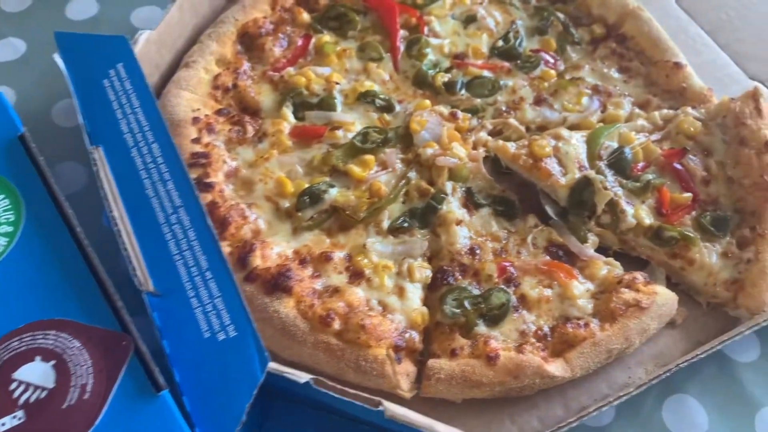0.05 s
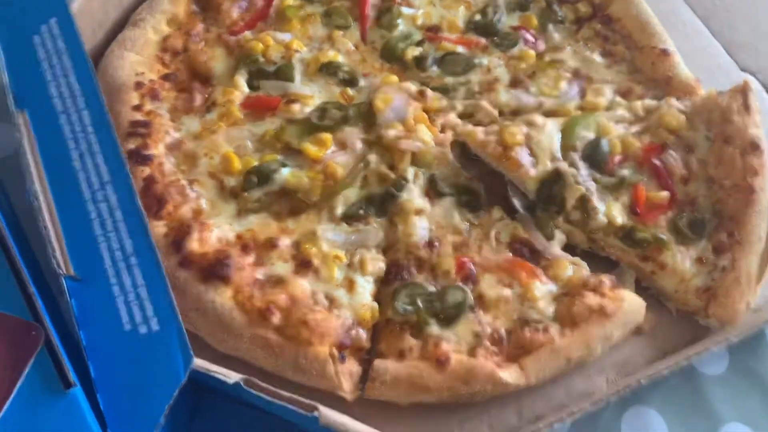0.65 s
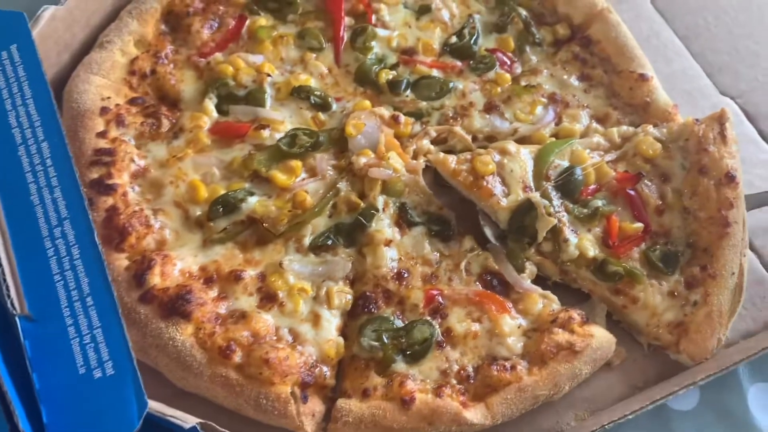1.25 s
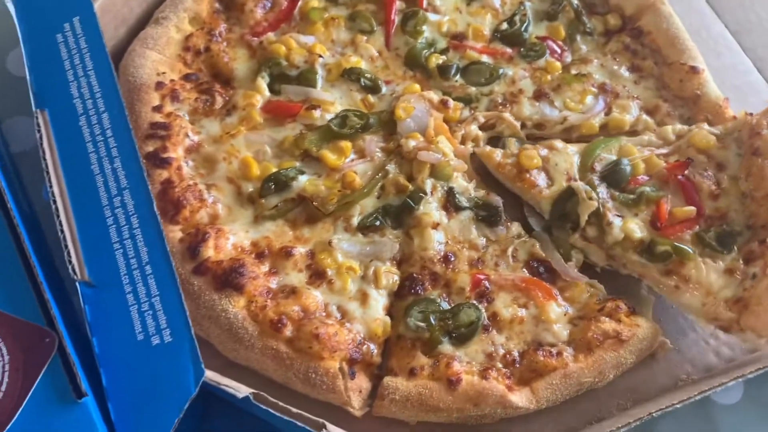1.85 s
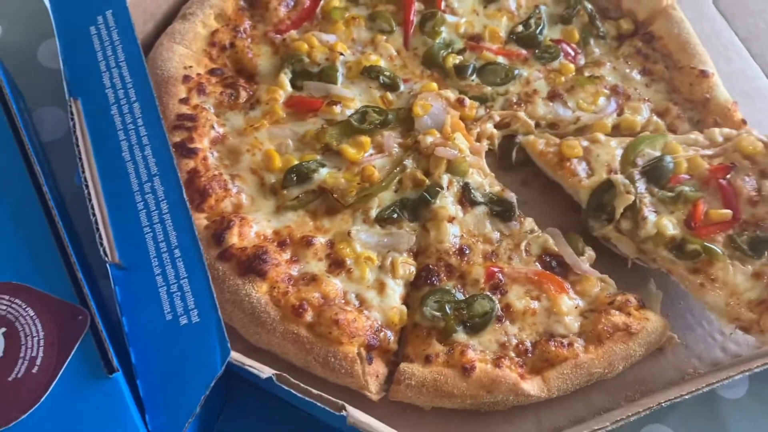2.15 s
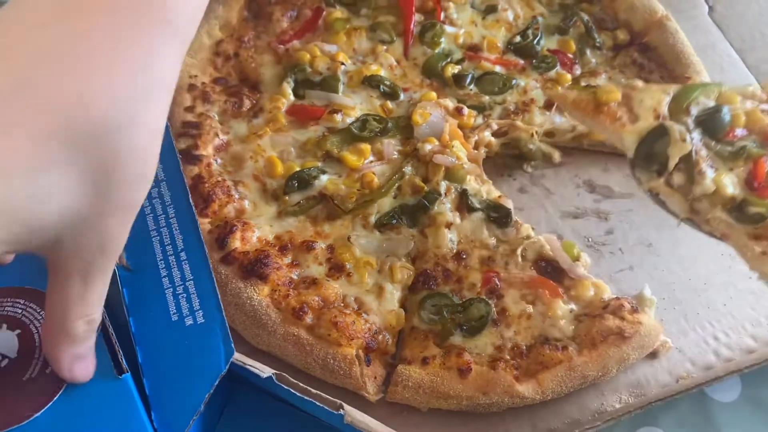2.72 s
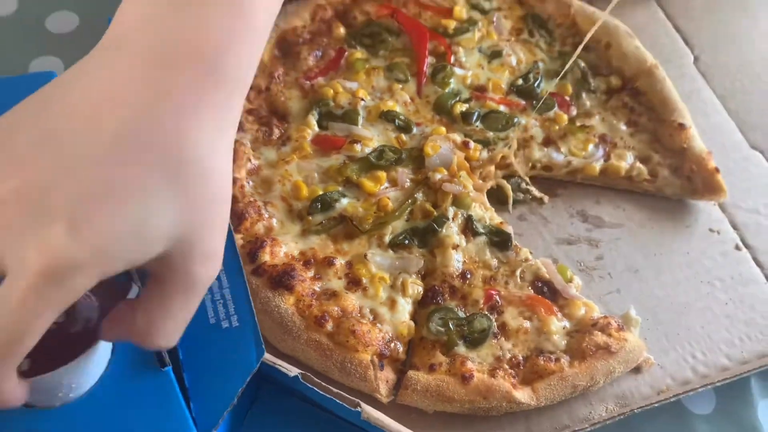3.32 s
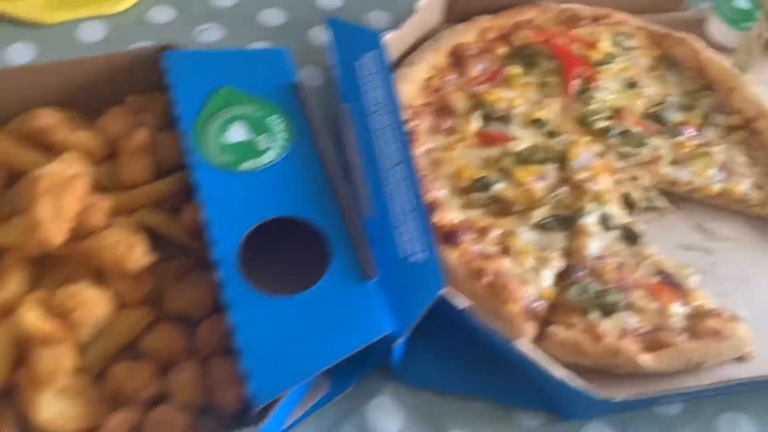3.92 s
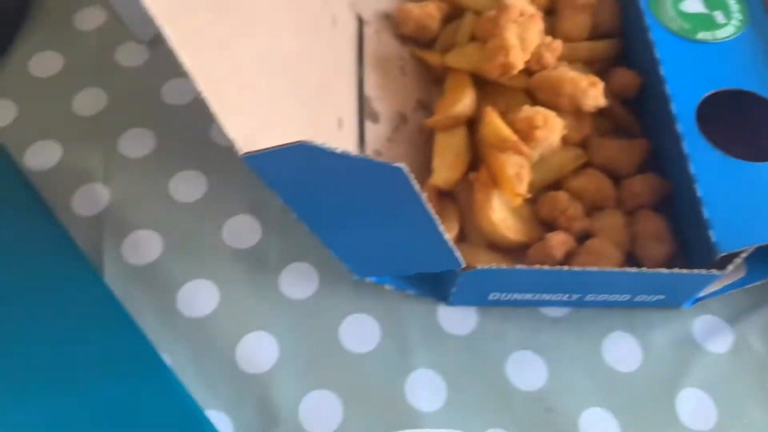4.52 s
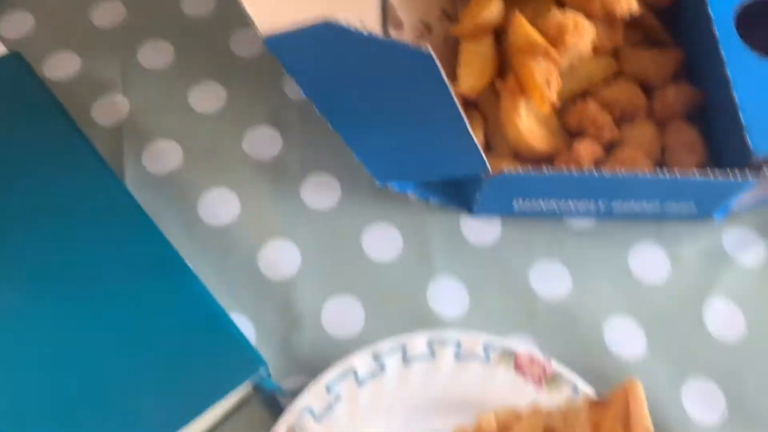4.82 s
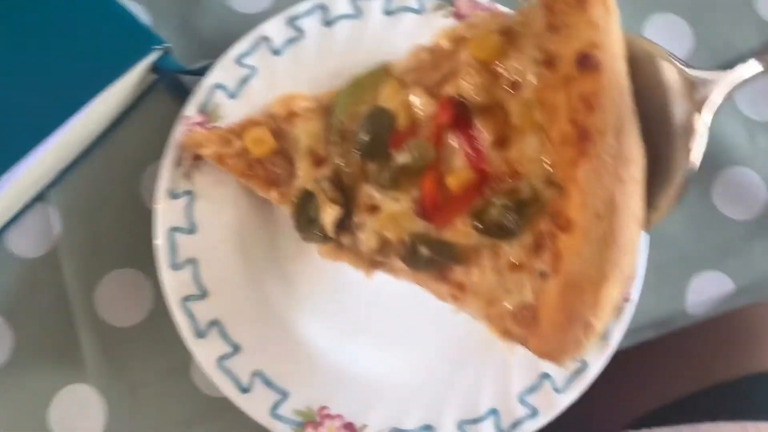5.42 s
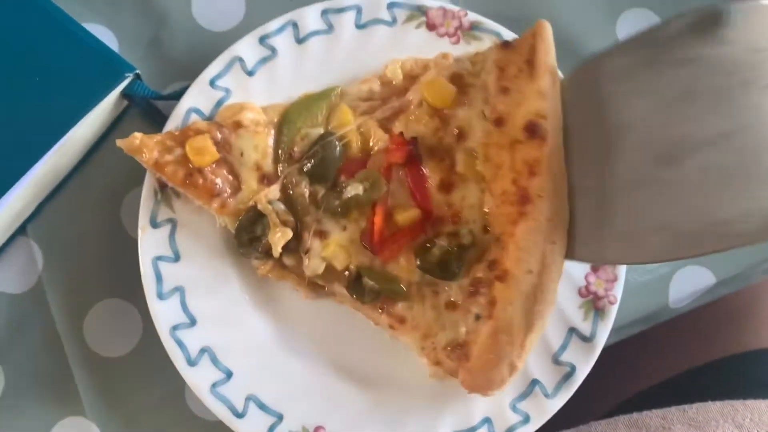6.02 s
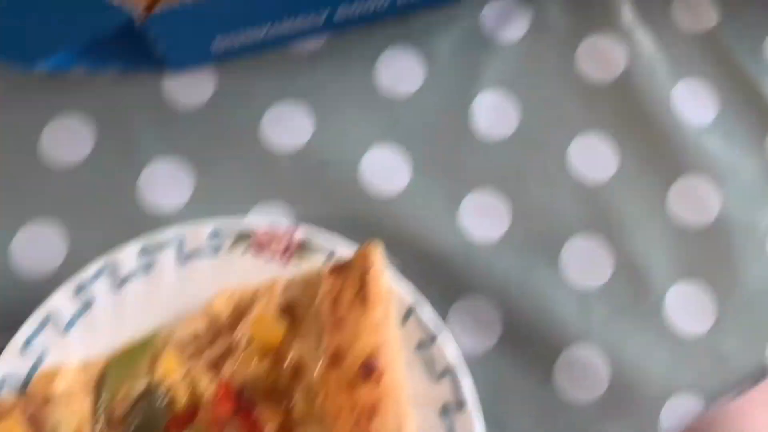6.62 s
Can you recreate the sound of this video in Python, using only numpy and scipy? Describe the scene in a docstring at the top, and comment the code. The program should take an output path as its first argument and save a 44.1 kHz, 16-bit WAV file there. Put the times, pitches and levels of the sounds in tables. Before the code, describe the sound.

Quiet pizza box handling, sharp clinks and scrapes of metal on a plate, and a short chair scrape in a small room.

```python
"""In a small, quiet dining room a slice of pizza is lifted from its cardboard box on a steel server.
The box rustles, flexes, bumps and ticks as hands, server and crust move over it.
From 5 s the blade clinks on a china plate, then scrapes out from under the crust, ringing at
other pitches once it is bare. At 6.5 s a chair judders over the floor, its leg sticking and slipping."""
import sys
import numpy as np
from scipy import signal
from scipy.fft import rfft, irfft, next_fast_len
from scipy.io import wavfile
from scipy.ndimage import uniform_filter1d

SR = 44100
rng = np.random.default_rng(int(sys.argv[2]) if len(sys.argv) > 2 else 0)


def output_pcm(signal):
    """Save a mono or channel-first signal as 16-bit PCM at the path in sys.argv[1].

    Samples are clipped to [-1, 1] before scaling.
    """
    pcm = np.clip(np.atleast_2d(signal).T, -1, 1) * 32767
    wavfile.write(sys.argv[1], SR, np.round(pcm).astype(np.int16))


N = 293645

# Cardboard panel modes. Each row: frequency in Hz, level in dB, t60 in seconds.
PANEL_MODES = [(310.5, -13, 0.11), (496, -12.5, 0.037), (719, 0.5, 0.015), (980, -6.5, 0.022),
               (1247, -1, 0.015), (1538, 1.5, 0.012), (2130, 4.5, 0.0058), (3290, -1.5, 0.012),
               (3950, -4.5, 0.011), (5350, -1.5, 0.0073), (9400, 2.5, 0.002)]
# China plate, damped by slice and cloth. Each row: frequency in Hz, level in dB, t60 in seconds.
PLATE_MODES = [(3170, 2, 0.03), (3900, -1, 0.021), (4130, 2.5, 0.047), (5250, 5.5, 0.025), (6877, 7, 0.032),
               (8630, -2, 0.019), (9650, -3, 0.03), (10400, 0, 0.02), (11340, -1.5, 0.075),
               (12230, -3, 0.025), (13960, -4, 0.05), (14868, -2, 0.094)]


def from_db(db):
    """Decibels to gain."""
    return 10 ** (np.asarray(db) / 20)


def rms_one(x):
    """Scale to unit rms."""
    return x / np.sqrt(np.mean(x ** 2) + 1e-20)


def peak_one(x):
    """Scale the loudest millisecond to unit rms."""
    return x / np.sqrt(uniform_filter1d(x ** 2, size=44).max())


def even(x, samples):
    """Hold the running rms at 1."""
    return x / np.sqrt(np.abs(uniform_filter1d(x ** 2, samples)) + 1e-12)


def cut(x, hz, kind, order=2):
    """Butterworth low- or high-pass."""
    return signal.sosfilt(signal.butter(order, min(hz, .45 * SR), kind, fs=SR, output="sos"), x)


def add(track, start_s, sound):
    """Mix a short sound into a track."""
    i = int(start_s * SR)
    track[i:i + len(sound)] += sound[:N - i]


def pan_left(x, db):
    """Left up, right down by db."""
    return x * from_db([[db], [-db]])


def wander(hz, samples=N):
    """Low-passed noise, unit rms."""
    return rms_one(cut(rng.standard_normal(samples), hz, "low"))


def at_hz(points, hz):
    """Interpolate on a log-frequency axis."""
    points_hz, values = np.transpose(points)
    return np.interp(np.log(hz + 0.0016), np.log(points_hz), values)


def coloured(pair, spectrum):
    """Two independent noises to partly alike stereo noise of a given spectrum, unit rms."""
    # Each row: frequency in Hz, left-right correlation.
    likeness = [(60, 1), (250, .88), (700, 0.069), (1300, 0.11), (2500, 0.91), (5000, 1), (15000, 1)]
    size = next_fast_len(N)
    hz = np.arange(size // 2 + 1) * SR / size
    low_hz, high_hz = spectrum[0][0], spectrum[-1][0]
    band_edges = np.sqrt((1 + (low_hz / (hz + 1)) ** 6) * (1 + (hz / high_hz / 1.2) ** 8))
    mid, side = rfft(pair, size) * from_db(at_hz(spectrum, hz)) / band_edges
    alike = np.clip(at_hz(likeness, hz), 0, 1)
    stereo = np.sqrt(1 + alike) * mid + np.sqrt(1 - alike) * side * [[1], [-1]]
    return rms_one(irfft(stereo, size)[:, :N])


def ring(push, modes, vary_db=0):
    """Drive a body's modes; the contact point varies their strengths."""
    out = 0
    for k, (hz, db, t60_s) in enumerate(modes):
        r, w = from_db(-60 / (t60_s * SR)), 2 * np.pi * hz / SR
        gain = (-1) ** k * from_db(db + vary_db * rng.standard_normal())
        out = out + gain * signal.lfilter([0, np.sin(w)], [1, -2 * r * np.cos(w), r * r], push + 1e-18)
    return out


def favour(modes, centre_hz, boost_db):
    """The contact point drives modes near one frequency hardest."""
    return [(hz, db + boost_db * np.exp(-(np.log(hz / centre_hz) / 0.09) ** 2), t60_s)
            for hz, db, t60_s in modes]


def contact(length_s, chatter, samples=11000):
    """One sharp touch, then smaller ones dying 30 dB in length_s."""
    t = np.arange(samples) / SR
    touches = rng.standard_normal(samples) * (rng.random(samples) < .3)
    push = chatter * touches * from_db(-30 * t / length_s)
    push[0] = 1
    return push


def grains(per_s, spread_db, smooth):
    """Two streams of tiny uneven slips over smooth friction noise."""
    sizes = from_db(spread_db * np.minimum(rng.exponential(1, (2, N)), 4))
    signs = rng.choice([-1, 1], (2, N))
    slips = sizes * signs * (rng.random((2, N)) < per_s / SR)
    return rms_one(slips) + smooth * rng.standard_normal((2, N))


def grip(depth_db):
    """Friction gain wandering with hand pressure."""
    return rms_one(from_db(depth_db * wander(hz=30)))


def swells(events, rise_db_per_s, fall_db_per_s, sag_db_per_s=0):
    """Envelope: each event rises until its start, holds or sags for its length, then falls."""
    step_samples = 44
    t = np.arange(0, N + step_samples, step_samples) / SR
    power = 1e-14
    for start_s, length_s, db in events:
        drop_db = (rise_db_per_s * np.maximum(start_s - t, 0)
                   + sag_db_per_s * np.clip(t - start_s, 0, length_s)
                   + fall_db_per_s * np.maximum(t - start_s - length_s, 0))
        power = power + from_db(db - drop_db) ** 2
    return np.interp(np.arange(N) / SR, t, np.sqrt(power))


def room_tone():
    """Steady quiet noise with a faint high whine."""
    # Each row: frequency in Hz, relative density in dB.
    spectrum = [(40, -8), (100, -3), (280, 1), (500, -5), (950, -12), (1320, -3), (1700, -15), (2400, -22),
                (3250, -14), (4200, -19), (5500, -22), (6350, -18), (7700, -25), (15500, -25)]
    # Each row: frequency in Hz, level in dB, t60 in seconds.
    whine_modes = [(6200, -6.5, 0.0083), (11000, 2, 0.0082)]
    noise = coloured(rng.standard_normal((2, N)), spectrum)
    whine = rms_one(ring(rng.standard_normal(N), whine_modes))
    return from_db(-56.5) * noise + from_db(-73.5) * whine


def stroke(events):
    """A movement over cardboard swells, tires a little and lets go."""
    return swells(events, rise_db_per_s=428, fall_db_per_s=133, sag_db_per_s=4.5)


def within_box(x):
    """Lid, walls and table reflect within milliseconds."""
    # Each row: delay in seconds, gain in dB.
    echoes = [(.0011, -17), (.0023, -41.5), (.0037, -27.5), (.0061, -9.5)]
    t = np.arange(N) / SR
    return x + sum(from_db(db) * np.array([np.interp(t - delay_s, t, side, left=0) for side in x])
                   for delay_s, db in echoes)


def box_rustle():
    """Fibres rub, crackle and ring the panels; crust hisses over the board."""
    # Hand, server and crust moves. Each row: start and length in seconds, rub and hiss levels in dB.
    strokes = [(0.009, 0.045, -57, -59), (0.119, 0.018, -46.5, -49), (0.252, 0.036, -51, -50),
               (0.508, 0.017, -52.5, -56.5), (1.362, 0.038, -56.5, -48), (1.543, 0.032, -45, -46),
               (1.87, 0.042, -44.5, -46.5), (1.97, .1, -48.5, -55), (2.08, 0.03, -51, -48),
               (2.167, 0.095, -48, -52), (2.395, 0.006, -50.5, -45), (2.551, 0.01, -40.5, -51),
               (2.606, 0.086, -50, -52), (2.714, 0.19, -48.5, -95), (2.94, 0.069, -52.5, -58.5),
               (3.03, 0.05, -48, -58.5), (3.164, 0.046, -55, -48.5), (3.275, 0.027, -52, -53.5),
               (3.332, 0.13, -55.5, -58.5), (4.3, 0.38, -56, -69), (4.74, 0.13, -50.5, -62),
               (4.916, 0.19, -48, -50), (5.107, 0.11, -54.5, -102), (6.146, 0.039, -72, -55.5)]
    # Fibre rub and crust hiss. Each row: frequency in Hz, relative density in dB.
    rub_spectrum = [(150, 4.5), (400, 3.5), (1500, 4.5), (3500, -3), (8000, -14), (15500, -14.5)]
    hiss_spectrum = [(3000, -2.5), (6500, 5), (15500, 2)]
    start_s, length_s, rub_db, hiss_db = np.transpose(strokes)
    rubbing = stroke(zip(start_s, length_s, rub_db))
    sliding = stroke(zip(start_s, length_s, hiss_db))
    fibres = grains(per_s=1300, spread_db=2.5, smooth=1.0)
    panels = from_db(-11) * rms_one(ring(fibres[1], PANEL_MODES))
    rub = from_db(-3.5) * rubbing * (coloured(fibres, rub_spectrum) + panels)
    crust = grains(per_s=13000, spread_db=4.0, smooth=0.76)
    hiss = from_db(-4) * sliding * coloured(crust, hiss_spectrum)
    snaps = grains(per_s=70, spread_db=1.5, smooth=0)[0]
    crackle = from_db(-11.5) * rubbing * rms_one(ring(snaps, PANEL_MODES))
    return within_box((rub + hiss + crackle) * grip(depth_db=1.5))


def box_flex():
    """Panels bend under load with a low rumble."""
    # Each row: start in seconds, length in seconds, level in dB.
    flexes = [(.05, 0.065, -52.5), (.135, 0.13, -43.5), (.34, 0.024, -57), (.53, 0.078, -53.5),
              (1.32, 0.43, -60.5), (1.905, 0.19, -58), (2.4, 0.017, -61.5), (2.7, 0.26, -57),
              (4.07, 0.042, -48), (4.92, 0.024, -51), (5.025, 0.23, -57.5), (5.15, 0.047, -50),
              (5.975, 0.015, -52.5)]
    # Each row: frequency in Hz, relative density in dB.
    spectrum = [(25, -62), (50, -0.5), (90, -8), (140, 9.5), (190, -3), (280, -0.5), (450, -6), (800, -8)]
    rumble = coloured(grains(per_s=270, spread_db=4.0, smooth=0.78), spectrum)
    return from_db(1.3) * stroke(flexes) * rumble


def hum(hz, rise_s):
    """A wavering tone that swells and dies."""
    t = np.arange(SR // 2) / SR
    swell = t / rise_s * np.exp(1 - t / rise_s)
    waver = 1 + 0.085 * wander(hz=95, samples=len(t))
    return swell ** 2 * np.sin(2 * np.pi * np.cumsum(hz * waver) / SR)


def box_bumps():
    """Soft pushes make the hollow box hum and the table thud; near 5 s the server's blow knocks it as well."""
    # Each row: start in seconds, level in dB, resonance in Hz, rise in seconds, thud in dB re the hum.
    bumps = [(.16, -34, 159, 0.02, -10), (.2, -44, 105, 0.023, -22), (0.265, -50.5, 231, 0.056, 1),
             (0.53, -48.5, 257, 0.022, -21), (1.29, -48.5, 68.5, 0.011, -11), (1.896, -42, 504, 0.021, -29),
             (2.853, -41, 131.6, 0.025, -35), (4.048, -39.5, 236, 0.027, -13), (4.06, -45, 131, 0.034, -24),
             (5.002, -34.5, 358, 0.0047, -13), (5.022, -48, 48.3, 0.044, -8)]
    out = np.zeros(N)
    for start_s, db, hz, rise_s, thud_db in bumps:
        bump = hum(hz, rise_s) + from_db(thud_db) * hum(hz=78.1, rise_s=0.05)
        add(out, start_s, from_db(db) * bump)
    return pan_left(out, db=0.69)


def box_taps():
    """Dead cardboard knocks, the brighter ones with a dry snap."""
    # Each row: start in seconds, peak in dB, snap in dB re the body, favoured Hz, chatter in seconds.
    taps = [(0.254, -52, -8, 640, 0.021), (1.542, -36.5, -10, 886, 0.0098), (1.597, -25, 25, 2410, 0.0017),
            (1.615, -41, 9, 2340, 0.0046), (2.063, -38.5, -14, 730, 0.0062), (2.21, -35, 10, 1500, 0.012),
            (2.2564, -31, 5.5, 1530, 0.025), (2.273, -42, -5, 1260, 0.08), (2.4724, -35, -4, 1690, 0.026),
            (2.531, -38, -18, 1060, 0.022), (2.5518, -31.5, 0, 3760, 0.012), (2.58, -46, -12, 1550, 0.018),
            (2.66, -44, 3, 3670, 0.014), (2.718, -35.5, -4.5, 2450, 0.0057),
            (3.028, -41.5, -7, 1404, 0.024), (3.041, -44, -3, 1430, 0.027), (3.093, -45.5, 3, 1490, 0.043),
            (3.296, -48, 4, 1380, 0.014), (3.311, -41.5, 5, 1480, .005), (3.337, -42.5, -27, 683, 0.094),
            (3.996, -48.5, -32, 1260, 0.12), (4.054, -37.5, -42, 636, 0.041),
            (4.055, -42, 25, 1950, 0.0088), (4.07, -38, -46, 2010, 0.14)]
    out = np.zeros(N)
    for start_s, db, snap_db, favoured_hz, chatter_s in taps:
        push = contact(chatter_s, chatter=0.45)
        body = peak_one(ring(push, favour(PANEL_MODES, favoured_hz, boost_db=18)))
        snap = from_db(snap_db) * peak_one(cut(push, 3600, "high", order=1))
        add(out, start_s, from_db(db) * peak_one(body + snap))
    return out


def box_squeak(start_s=0.573, length_s=0.12, db=-59.5):
    """Board squeaks faintly on board."""
    # Each row: frequency in Hz, level in dB, t60 in seconds.
    modes = [(2450, 6.5, 0.014), (3000, 2.2, 0.0098)]
    return stroke([(start_s, length_s, db)]) * rms_one(ring(rng.standard_normal(N), modes))


def blade_modes(bare, favoured_hz, boost_db, detune):
    """Steel modes with or without the slice's weight; changing load shifts each a little."""
    # Each row: frequency in Hz, level in dB, t60 in seconds.
    loaded_modes = [(2418, -11.5, 0.05), (2990, -9, 0.059), (3856, 0, 0.054), (4920, -7, 0.02),
                    (5373, -2.5, 0.071), (5900, -13, 0.032), (6830, -1.5, 0.074), (6890, -9, 0.024),
                    (7700, -12, 0.03), (8400, 4, 0.034), (9220, 1.5, 0.023), (10450, -8.5, 0.016),
                    (11200, -2.5, 0.043), (12300, -4, 0.028), (14300, -1, .03), (14840, -9, .04)]
    bare_modes = [(1990, -17, 0.16), (2370, -0.5, 0.018), (3036, -2.5, 0.065), (3340, -9, 0.19),
                  (4105, 2.5, 0.039), (4730, -5.5, 0.06), (5140, -1.5, 0.016), (5360, -7.5, 0.028),
                  (5900, -5, 0.048), (6480, -3, 0.029), (6985, -1, 0.12), (8270, -4, 0.07), (8750, -6, .05),
                  (9500, -0.5, .035), (10620, 0.5, 0.061), (12030, -5, 0.058), (12600, -5, 0.054),
                  (14500, -1, 0.04)]
    modes = favour(bare_modes if bare else loaded_modes, favoured_hz, boost_db)
    return [(hz * (1 + detune * rng.standard_normal()), db, t60_s) for hz, db, t60_s in modes]


def clash(push, t60_s=0.033, samples=2200):
    """Countless weak steel and china modes, heard as a splash of noise."""
    burst = rng.standard_normal(samples) * from_db(-60 * np.arange(samples) / SR / t60_s)
    burst = cut(cut(burst, 2600, "high"), 12000, "low", order=1)
    return from_db(17.5) * signal.fftconvolve(push, burst / np.linalg.norm(burst))[:len(push)]


def clinks(damp_db=3.5, damp_s=0.0137):
    """Each touch rings plate and blade and knocks the table; glancing ones are duller."""
    # Each row: start in seconds, peak in dB, plate re blade in dB, table knock in dB, favoured Hz,
    # its boost in dB, chatter in seconds, low-pass in Hz, blade bare 0/1.
    touches = [(5.0038, -8.5, 32, -14, 4130, 5.5, 0.0016, 14700, 0),
               (5.0093, -22, 4, -6, 11300, 3, 0.0033, 16300, 0),
               (5.393, -38.5, -2, -8.5, 3600, 4, 0.064, 15100, 0),
               (5.427, -40.5, -7, -3, 7000, -3, 0.069, 14300, 0),
               (5.4837, -39.5, -1, -12, 4000, 9, 0.018, 14100, 0),
               (5.526, -18.5, 2.5, -29, 3770, 5, 0.005, 10400, 0),
               (5.682, -39, -16, -16, 11100, -2, 0.069, 16000, 0),
               (5.7065, -27, -7, -28, 10600, 10.5, 0.026, 15000, 0),
               (5.7281, -21.5, -24, -25.5, 2390, 8.5, 0.023, 11300, 0),
               (5.916, -27, -9, -26, 7800, 23, 0.007, 16000, 0),
               (5.9223, -26.5, -11, -32, 11200, 14, 0.007, 14000, 0),
               (5.9577, -18, -31, -15, 5560, 15.5, 0.012, 7550, 1),
               (5.963, -27.5, -17, -7, 2260, 12.5, 0.014, 8600, 1),
               (6.0457, -21.5, -23, -16.5, 3050, 8, 0.023, 15100, 1),
               (6.05, -25.5, -18, -28, 11000, 1, 0.029, 16300, 1),
               (6.055, -26.5, -19.5, -6.5, 4140, 15.5, 0.018, 15400, 1)]
    # Each row: frequency in Hz, level in dB, t60 in seconds.
    table_modes = [(80.8, -14, 0.25), (261.8, -9.5, 0.21), (405, -3, 0.062), (672, 3, 0.039),
                   (860, -1.5, 0.045), (1190, 0.5, 0.023), (1670, 6.5, 0.013)]
    out = np.zeros(N)
    for start_s, db, plate_db, knock_db, favoured_hz, boost_db, chatter_s, top_hz, bare in touches:
        push = contact(chatter_s, chatter=0.33)
        t = np.arange(len(push)) / SR
        plate = cut(ring(push, favour(PLATE_MODES, favoured_hz, boost_db)), 2300, "high")
        blade = ring(push, blade_modes(bare, favoured_hz, boost_db, detune=0.0029), vary_db=4.0)
        hit = (from_db(plate_db) * plate + blade) / np.hypot(from_db(plate_db), 1)
        # The surfaces stay together and smother the ring.
        hit *= from_db(-damp_db * np.clip((t - chatter_s / 3) / damp_s, 0, 1))
        hit += from_db(knock_db) * ring(push, table_modes, vary_db=4.5) + clash(push)
        add(out, start_s, from_db(db) * peak_one(cut(hit, top_hz, "low")))
    return out


def blade_drag(pull_samples=26000):
    """Steel catches on the glaze; each pull builds until the blade slips free."""
    # Each row: slip time in seconds, peak in dB, build-up in dB/s, favoured Hz, blade bare 0/1.
    pulls = [(5.26, -72, 202, 7000, 0), (5.3, -52, 201, 7000, 0), (5.36, -57.5, 150, 7000, 0),
             (5.525, -40, 237, 3840, 0), (5.66, -57, 600, 3840, 0), (5.716, -40, 262, 5330, 0),
             (5.745, -43, 900, 5330, 0), (5.874, -40.5, 303, 3840, 0), (5.901, -35.5, 454, 3840, 0),
             (5.927, -35.5, 606, 3840, 0), (6.001, -42.5, 258, 5430, 1), (6.072, -42, 500, 3355, 1)]
    out = np.zeros(N)
    catches = grains(per_s=650, spread_db=3.0, smooth=0.082)[0] * grip(depth_db=2.2)
    for slip_s, db, rise_db_per_s, favoured_hz, bare in pulls:
        first = int(slip_s * SR) - pull_samples // 2
        span = slice(first, first + pull_samples)
        modes = blade_modes(bare, favoured_hz, boost_db=10.5, detune=0.0048)
        steel = rms_one(ring(catches[span], modes, vary_db=3.0))
        china = from_db(-12) * rms_one(ring(catches[span], PLATE_MODES))
        splash = from_db(1) * rms_one(clash(catches[span]))
        rasp = even(steel + china + splash, samples=1300)
        effort = swells([(slip_s, 0, db)], rise_db_per_s, fall_db_per_s=298)[span]
        add(out, first / SR, effort * rasp)
    return out


def chair(slip_hz=122.8, jitter=0.03, rise_db_per_s=2602):
    """A nudge, two shoves: a leg sticks and slips, shaking the frame and grinding grit."""
    # Each row: start and length in seconds, then boom, judder and grit levels in dB.
    shoves = [(6.5, 0.015, -32, -47.5, -39.5), (6.529, 0.03, -13.5, -22.5, -34),
              (6.582, 0.019, -34, -24, -38.5)]
    # Wooden frame and leg. Each row: frequency in Hz, level in dB, t60 in seconds.
    frame_modes = [(164, -29.5, 0.14), (197, -9, 0.094), (236.8, 2.5, 0.32), (285, -2.5, 0.28),
                   (320, -3, 0.16), (341, -19, 0.19), (379, -15.5, 0.11), (436, -12.5, 0.19)]
    leg_modes = [(393, -12.5, 0.015), (500, 0, 0.039), (601, 2, 0.053), (734, -3.5, 0.15),
                 (983, -9.5, 0.099), (1180, -23, 0.045), (1300, -24, .06)]
    # Each row: frequency in Hz, relative density in dB.
    grit_spectrum = [(700, -9.5), (1200, -4.5), (2000, -13), (3000, -22), (4500, -32), (8000, -38.5),
                     (15500, -41.5)]
    start_s, length_s, boom_db, judder_db, grit_db = np.transpose(shoves)
    throb_hz, throb_db, throb_peak_s = 27.2, 3.5, 6.555
    throb = from_db(throb_db * np.cos(2 * np.pi * throb_hz * (np.arange(N) / SR - throb_peak_s)))
    boom = throb * swells(zip(start_s, length_s, boom_db), rise_db_per_s, fall_db_per_s=56)
    judder = swells(zip(start_s, length_s, judder_db), rise_db_per_s, fall_db_per_s=480.5)
    grit = swells(zip(start_s, length_s, grit_db), rise_db_per_s, fall_db_per_s=289)
    cycles = np.cumsum(slip_hz * (1 + jitter * wander(hz=90))) / SR
    slips = np.diff(np.floor(cycles), prepend=0) * from_db(4.2 * rng.standard_normal(N))
    scatter = 0.018 * rng.standard_normal((2, N))   # under the table, unlike on each side
    push = cut(slips, 2600, "low") + scatter
    shake = push + 0.067 * rng.standard_normal(N)
    frame = boom * even(cut(ring(shake, frame_modes), 140, "high"), samples=700)
    leg = judder * even(ring(push, leg_modes), samples=900)
    slip_pulses = rms_one(np.exp(-0.7 * (cycles % 1)))
    grinding = grit * slip_pulses * coloured(rng.standard_normal((2, N)), grit_spectrum)
    return pan_left(frame + leg, db=0.77) + grinding


def room(x, low_t60_s=0.47, high_t60_s=0.16):
    """Diffuse stereo reflections; treble dies sooner."""
    t = np.arange(SR // 2) / SR
    noise = rng.standard_normal((2, len(t))) * (1 - np.exp(-t / 0.017))
    low = cut(noise, 1600, "low") * from_db(-60 * t / low_t60_s)
    high = cut(noise, 2600, "high") * from_db(-60 * t / high_t60_s)
    return signal.fftconvolve(x[None], rms_one(low + high) / np.sqrt(len(t)), axes=1)[:, :N]


def stereo_phase(x, half_turn_hz=2130, step_rad=0.42):
    """Shift left against right by a frequency-dependent phase, widening the treble."""
    # Each row: frequency in Hz, lead of the left channel in radians.
    leads = [(0, 0), (250, -.2), (700, -.8), (1500, -.35), (2000, .8), (3750, 1.4), (4250, 2.1),
             (4700, 3.1), (5700, 4.7)]
    size = next_fast_len(N + 512)
    hz = np.arange(size // 2 + 1) * SR / size
    # Above the last row the lead climbs in soft half-turn steps.
    climb_rad = np.pi * np.maximum(hz - leads[-1][0], 0) / half_turn_hz
    lead_rad = np.interp(hz, *np.transpose(leads)) + climb_rad + step_rad * np.sin(2 * climb_rad)
    return irfft(rfft(x, size) * np.exp(.5j * lead_rad * np.array([[1], [-1]])), size)[:, :N]


def scene():
    """Box, server and chair in a quiet room."""
    background = room_tone()
    taps = box_taps()
    box = box_rustle() + box_flex() + box_bumps() + taps + box_squeak()
    server = clinks() + blade_drag()
    reflections = room(from_db(-13) * taps + from_db(-14.5) * server)
    return stereo_phase(background + box + server + reflections + chair())


def record(dry, cutoff_hz=15900):
    """Steep elliptic low-pass."""
    return signal.sosfilt(signal.ellip(10, .2, 80, cutoff_hz, fs=SR, output="sos"), dry)


dry = scene()
out = record(dry)
output_pcm(out)
```